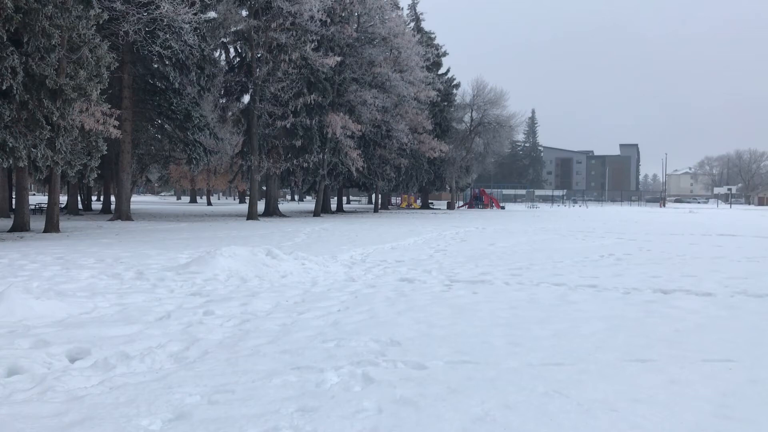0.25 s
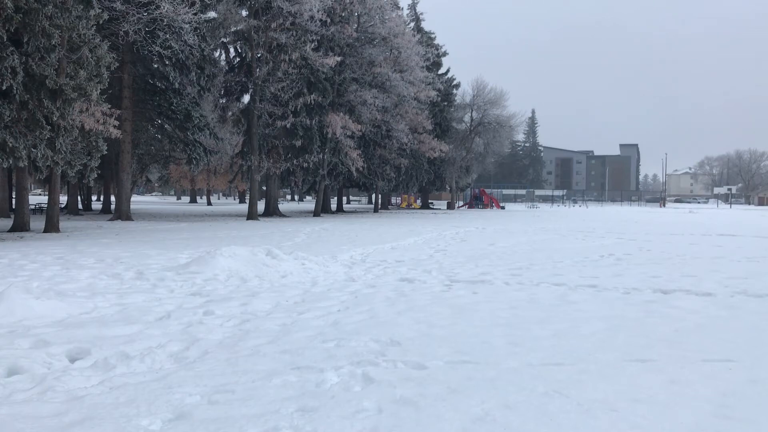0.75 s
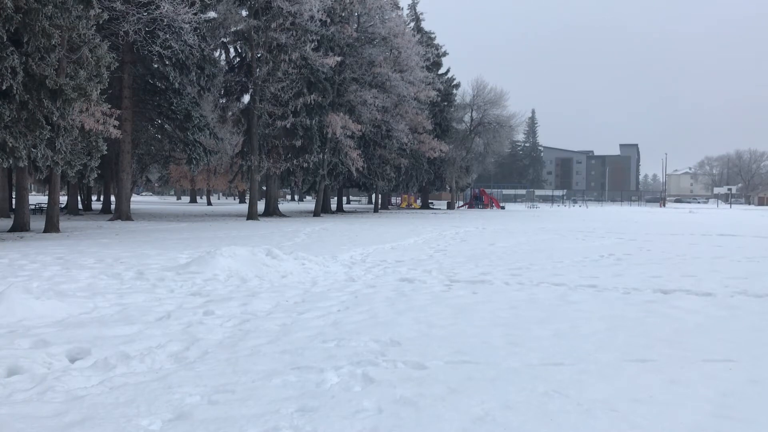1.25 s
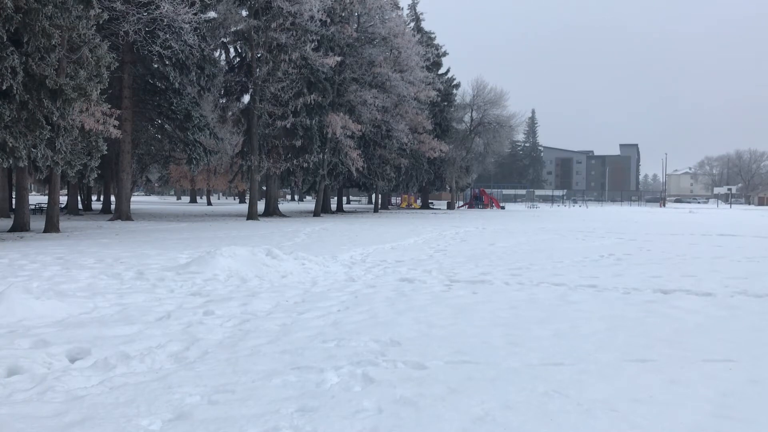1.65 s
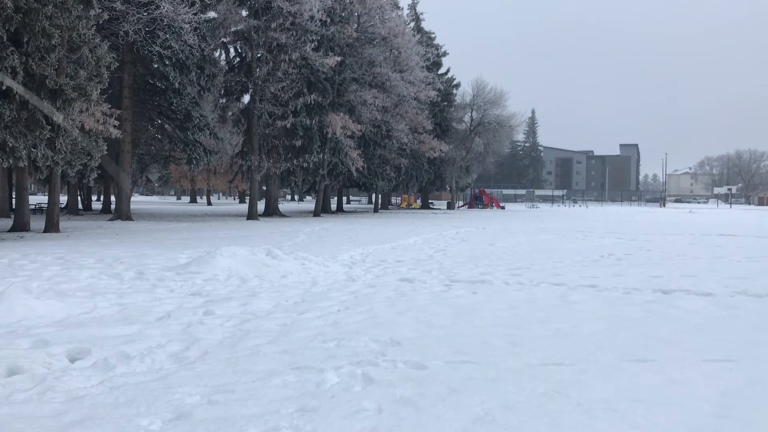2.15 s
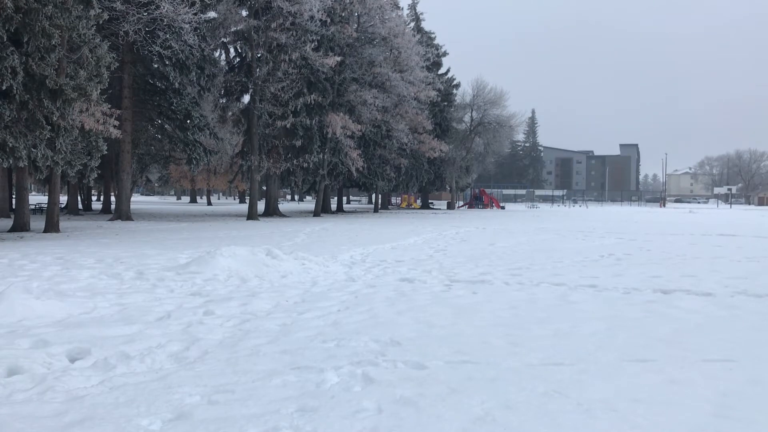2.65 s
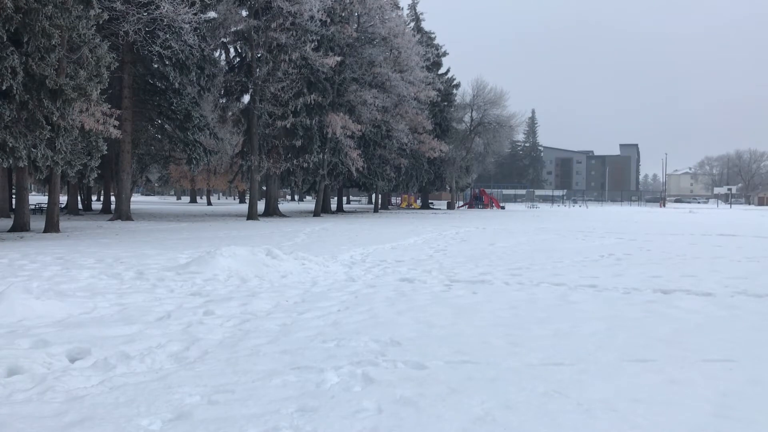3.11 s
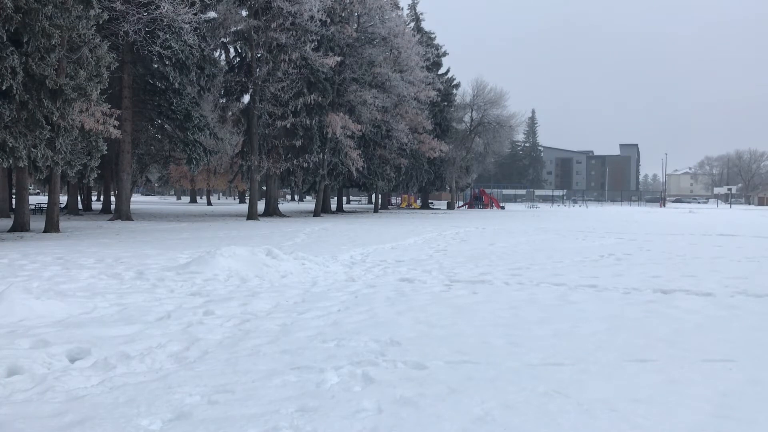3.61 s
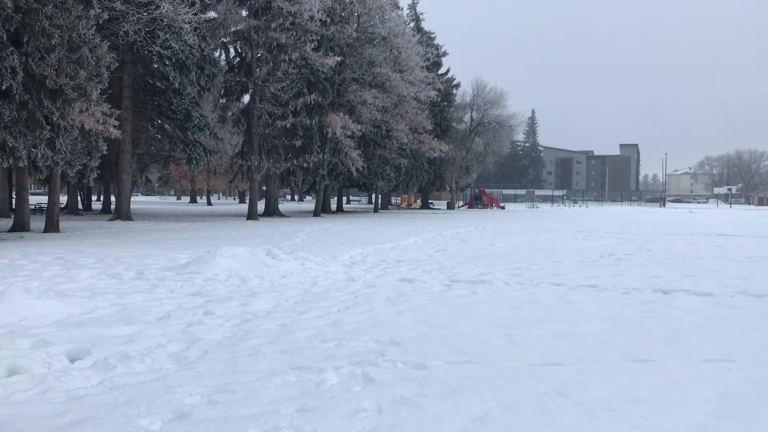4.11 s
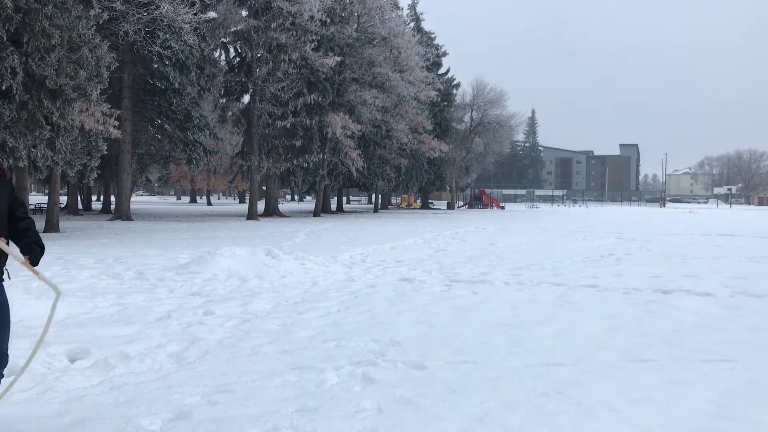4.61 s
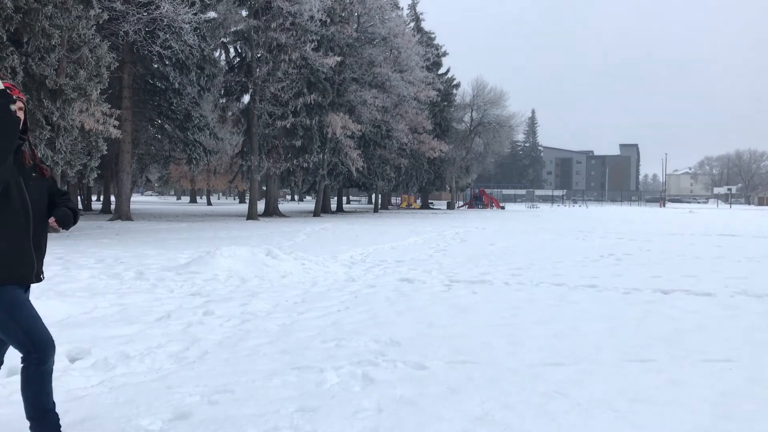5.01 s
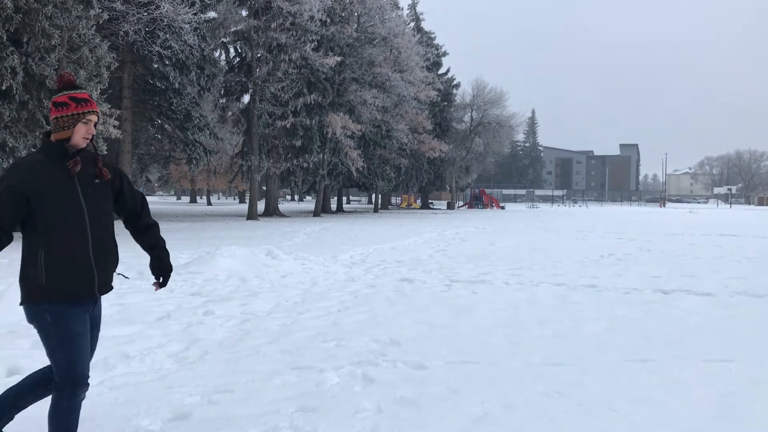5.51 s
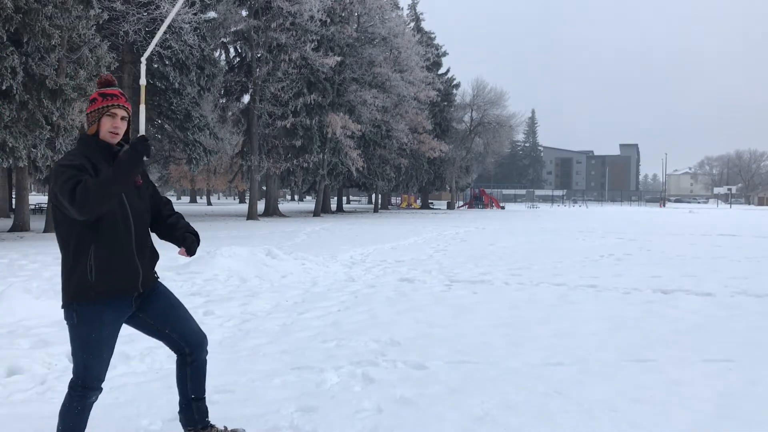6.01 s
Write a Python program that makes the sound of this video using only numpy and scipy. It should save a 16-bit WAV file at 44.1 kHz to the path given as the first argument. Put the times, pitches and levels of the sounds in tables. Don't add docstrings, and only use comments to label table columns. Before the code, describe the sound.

Outdoors in quiet winter air, a whip whistles up to piercing supersonic snaps, two thumping the microphone, each answered by scattered echoes from trees.

```python
import sys
import numpy as np
from scipy import signal
from scipy.fft import rfft, irfft, next_fast_len
from scipy.io import wavfile
from scipy.ndimage import uniform_filter1d

SR = 44100
rng = np.random.default_rng(int(sys.argv[2]) if len(sys.argv) > 2 else 0)


def store_wav(level_fs):
    pcm = np.round(np.clip(np.atleast_2d(level_fs), -1, 1) * 32767)
    wavfile.write(sys.argv[1], SR, pcm.T.astype(np.int16))


def elevation(decibels):
    levels = np.asarray(decibels, float)
    return 10 ** (levels / 20)


N = 275869


def evened(x):
    return x / np.sqrt(np.mean(x ** 2) + 1e-20)


def add(mix, s, sound):
    part = mix[round(s * SR):][:len(sound)]
    part += sound[:len(part)]


def coloured(x, points):
    f, db = np.transpose(points)
    size = next_fast_len(len(x))
    hz = np.fft.rfftfreq(size, 1 / SR)
    gain = elevation(np.interp(np.log(hz + 1), np.log(f), db))
    return irfft(rfft(x, size) * gain, size)[:len(x)]


def filtered(x, order, hz, kind):
    return signal.lfilter(*signal.butter(order, hz, kind, fs=SR), x)


def swell(length, peak, steep):
    u = np.arange(round(1.5 * length * SR)) / (length * SR)
    peak = np.clip(peak, .03, .97)
    fall = np.exp(-steep * np.maximum(u - peak, 0) / (1 - peak))
    fall *= np.minimum(4 * (1.5 - u), 1)
    return np.minimum(u / peak, 1) ** 1.5 * fall


def grains(per_s, spread_db, tail_s):
    sizes = elevation(spread_db * np.minimum(rng.exponential(1, N), 4))
    flashes = sizes * (rng.random(N) < per_s / SR)
    return rng.standard_normal(N) * signal.lfilter([1], [1, -np.exp(-1 / (tail_s * SR))], flashes)


# time in seconds, scattered echo in dB, trunk echo in dB,
# gain control dip in dB, recovery in seconds.
CRACKS = [
    (1.327, -50, -27.5, 11.5, 1),
    (2.782, -43, -25, 8, 0.065),
    (4.149, -43.5, -25.5, -1, 0.078),
    (5.418, -41.5, -29, 6, 0.083),
    (5.686, -59.5, -30, 8.5, 0.17),
]


def ducking():
    t = np.arange(N) / SR
    dip_db = sum(depth_db * np.exp(-abs(t - s) / recovery) * (t > s)
                 for s, _, _, depth_db, recovery in CRACKS)
    return elevation(-dip_db)


# time in seconds, rumble level in dB.
GUSTS = [(0, -63.5), (.5, -68), (.8, -66), (1.3, -65), (1.7, -66), (2.0, -57.5), (2.3, -53), (2.55, -60.5),
         (3.0, -65.5), (3.3, -62), (3.75, -65), (4.0, -63.5), (4.35, -57.5), (4.7, -62.5), (5.3, -65.5),
         (5.55, -50), (5.8, -68), (6.26, -64.5)]
# frequency in Hz, level in dB.
RUMBLE = [(15, -33.5), (30, -8.5), (45, 6), (70, 1.5), (110, -13), (250, -38)]


def wind():
    level = elevation(np.interp(np.arange(N) / SR, *np.transpose(GUSTS)))
    flutter = elevation(2.5 * evened(uniform_filter1d(rng.standard_normal(N), 3000)))
    rumble = evened(coloured(flutter * rng.standard_normal(N), RUMBLE))
    return elevation(2.5) * level * rumble * ducking()


# time of the peak in seconds, level in dB.
DRAGS = [
    (1.3, -63.5),
    (2.2, -62),
    (2.77, -55),
    (4.15, -55.5),
    (4.4, -67),
    (5.42, -50.5),
    (5.62, -73),
    (5.98, -59),
]
# frequency in Hz, level in dB per Hz.
WASH = [(59, -22), (100, -7), (285, -.5), (400, -3), (960, -2.5), (1500, -8), (2500, -16), (3500, -22),
        (5000, -30), (8000, -36), (16500, -38)]


def town_and_dragged_air():
    t = np.arange(N) / SR
    town_db, slope_db_per_s = -65.5, 154
    level = elevation(town_db) + sum(elevation(db - slope_db_per_s * abs(t - s)) for s, db in DRAGS)
    return elevation(7.5) * level * evened(coloured(rng.standard_normal(N), WASH)) * ducking()


# time in seconds, level
# in dB.
RUSTLE_LEVEL = [(0, -82.5), (.5, -81.5), (1.17, -90.5), (1.4, -72.5), (1.65, -73.5), (2.3, -78.5), (2.63, -81.5),
                (2.798, -60), (3.07, -74.5), (3.45, -75.5), (3.95, -100), (4.2, -60.5), (4.55, -61.5),
                (4.75, -78.5), (5.3, -75), (5.45, -58), (5.68, -64.5), (6.26, -76.5)]
# frequency in Hz, level in dB.
RUSTLE = [(1000, -33), (3000, -13), (5000, 7), (7000, 3), (9000, 9.5), (15000, 6), (17000, -8)]


def cloth():
    level = elevation(np.interp(np.arange(N) / SR, *np.transpose(RUSTLE_LEVEL)))
    rustle = .25 * evened(grains(170, 3, .00083)) + 2.3 * rng.standard_normal(N)
    rustle *= elevation(3.5 * evened(uniform_filter1d(rng.standard_normal(N), 900)))
    return elevation(10) * level * evened(coloured(rustle, RUSTLE))


# time in seconds, peak in dB.
TICKS = [(0.0207, -21.5), (0.0308, -21), (0.0376, -18), (0.2656, -33.5), (0.51, -34), (0.5716, -27.5),
         (0.623, -40), (1.5384, -30), (1.7744, -36), (1.7913, -30), (1.8452, -34), (1.885, -28.5),
         (2.0564, -34), (2.1774, -36), (2.5651, -38.5), (2.8467, -17), (2.8574, -22.5), (3.153, -32.5),
         (3.1838, -34), (3.3548, -31), (3.3788, -37), (3.4753, -17), (3.708, -32), (4.736, -28.5),
         (4.7601, -31.5), (5.155, -17.5), (5.1623, -22), (5.785, -23), (5.889, -32), (6.122, -29.5)]


def cloth_ticks():
    out, t = np.zeros(N), np.arange(600) / SR
    for s, db in TICKS:
        burst = evened(filtered(rng.standard_normal(len(t)), 1, 3000, "high"))
        add(out, s, elevation(db - 1) * burst * t / .0016 * np.exp(-t / .00083))
    return out


# delay in seconds, level in dB.
GROVE = [(.04, -9.5), (.1, -2), (.17, -4), (.26, -2.5), (.45, -10), (.65, -12.5), (.78, -10), (0.961, -9),
         (1.4, -31.5)]
# delay in seconds, half width in seconds, depth in dB.
CLEARINGS = [(0.066, .015, 6), (0.194, .014, 6), (.345, 0.0095, 2), (.42, 0.027, 2.5), (.53, .015, 3),
             (.68, 0.056, 2.5), (.88, 0.056, 1.5)]
# frequency in Hz, level in dB.
NEAR = [(500, -21.5), (1000, -27), (2500, -2.5), (4000, 4.5), (5500, -5), (7500, -8), (10000, -21),
        (15000, -39)]
FAR = [(300, -30), (700, -10), (1300, 0), (2300, 0), (3200, -5), (4500, -15), (9000, -40)]


def grove():
    t, (delay, db) = np.arange(N) / SR, np.transpose(GROVE)
    near, far = np.zeros((2, N))
    for s, echo_db, *_ in CRACKS:
        gap_db = sum(depth_db * np.exp(-((t - s - at) / width) ** 2) for at, width, depth_db in CLEARINGS)
        level = elevation(echo_db - gap_db + np.interp(t - s, delay, db, -99, -99))
        near += level * elevation(1.5 - 28 * abs(t - s))
        far += level
    patter = evened(grains(1800, 2.8, .0004)) + .7 * rng.standard_normal(N)
    return ducking() * (near * evened(coloured(patter, NEAR)) + far * evened(coloured(patter, FAR)))


# delay in seconds, level in dB, pitch in Hz.
TRUNKS = [(.08, -4, 1700), (.096, -11, 1500), (.101, 3.5, 2000), (.138, -1, 1150), (.162, 0, 1490),
          (.174, -15, 1997), (.214, -5, 1120), (0.242, -3, 1550), (.253, -4.5, 1250), (.29, -4, 1600),
          (.368, -10.5, 1300), (.38, -11, 1410), (.477, -9, 1390), (.503, -10, 1925), (.549, -6.5, 1300),
          (.566, -10, 2252), (.746, -1, 1678), (0.755, -7, 2224), (0.793, -10, 1550), (.934, -8.5, 1720),
          (.952, -10.5, 1440)]
WALL_LAG_S = [0, 0, .021, 0, 0]
# time in seconds, peak in dB, pitch
# in Hz.
STRAYS = [(2.0825, -33, 2900), (2.136, -38, 1500), (3.201, -39, 1510), (4.0331, -40.2, 1054),
          (4.0831, -31.2, 1070), (4.0901, -35, 1801), (4.675, -38, 1700), (4.744, -39, 1250),
          (4.9351, -31, 1490), (3.5911, -31, 1500), (5.0601, -32.2, 1180), (5.0791, -40.2, 1821),
          (5.5191, -29, 1101), (5.8531, -28.5, 905), (6.2521, -38, 2760)]


def trunk_taps():
    out, t = np.zeros(N), np.arange(600) / SR
    taps = list(STRAYS)
    for (s, _, echo_db, *_), lag in zip(CRACKS, WALL_LAG_S):
        for delay, db, hz in TRUNKS:
            late = lag * (delay > .7)
            taps.append((s + delay + late, echo_db + db, hz))
    for s, db, hz in taps:
        grit = evened(filtered(rng.standard_normal(len(t)), 2, [.5 * hz, 1.8 * hz], "band"))
        ring = .9 * np.sin(2 * np.pi * hz * t) + grit
        add(out, s, elevation(db - 1.5) * ring * t / .0011 * np.exp(-t / .0012))
    return out * ducking()


# delay in seconds, level in dB.
GLINTS = [(.103, -2), (.1295, -6), (.138, -7), (.165, -4), (.1735, -4), (.228, -8), (.239, -7), (.2432, -1),
          (.27, -9), (.2884, -8), (.301, -5), (.3362, -9), (.3671, -11), (.38, -2), (.4037, -14),
          (.4179, -12), (.495, -13), (.5037, -9), (.551, -13), (.569, -14), (.592, -17)]
# time in seconds, glint level in dB.
MIRRORED = [
    (1.3267, -39),
    (2.7824, -24.5),
    (4.1504, -26),
    (5.4181, -31),
    (5.6857, -35),
]


def shock_glints():
    out, t = np.zeros(N), np.arange(600) / SR
    glint = filtered(np.exp(-((t - .0002) / .00004) ** 2), 1, [1000, 4200], "band")
    for s, shock_db in MIRRORED:
        for delay, db in GLINTS:
            add(out, s + delay - .0002, -elevation(shock_db + db) * glint / glint.max())
    return out * ducking()


def strand(length, hz0, hz1, db, peak):
    shape = swell(length, peak, 1.53)
    hz = hz0 * (hz1 / hz0) ** (np.arange(len(shape)) / (length * SR))
    seed = rng.standard_normal((9000, 2)) @ [1, 1j]
    smooth = np.exp(-np.pi * .24 * hz.mean() / SR)
    two_poles = np.convolve([1, -smooth], [1, -smooth])
    wander = signal.lfilter([1, -smooth ** 4], two_poles, seed)[-len(shape):]
    wander = .75 + wander / np.sqrt(np.mean(abs(wander) ** 2))
    tone = np.exp(2j * np.pi * np.cumsum(hz) / SR)
    return elevation(db) * shape * (wander * tone).real


# start in seconds, length in seconds, first Hz, last Hz, level in dB.
BUILDING = [(0.727, 0.07, 503, 1260, -54), (0.754, 0.024, 1000, 1020, -37), (0.765, 0.015, 1275, 1650, -37),
            (.722, .014, 280, 330, -51), (1.228, .11, 455.5, 2084, -45), (1.244, 0.11, 299.3, 1000, -43.5),
            (1.3, 0.015, 1490, 3500, -33.5), (1.3155, 0.0065, 4310, 4160, -17.5),
            (2.215, .055, 771, 932, -43), (2.745, .026, 900, 1500, -41), (4.848, .024, 600, 1200, -42),
            (2.738, .022, 230, 420, -35), (1.302, .012, 1000, 2500, -29), (2.683, .095, 510, 1510, -60),
            (3.622, .02, 2400, 3100, -36), (4.12, 0.022, 1100, 1610, -28.5),
            (4.131, .022, 2180, 2800, -17.5), (4.065, .075, 320, 480, -45), (5.372, .045, 249, 800, -39.5),
            (5.304, .1, 290, 469, -43), (5.35, 0.055, 936, 1500, -35), (5.671, 0.01, 1974, 2700, -23),
            (5.967, 0.031, 1404, 2930, -38.5)]
FADING = [(.779, .012, 1900, 1500, -30), (.79, .04, 1450, 1150, -35), (.784, .016, 900, 880, -43),
          (.808, .022, 2600, 2400, -52), (2.254, .014, 1600, 1650, -33), (2.267, .03, 1800, 1350, -28),
          (2.257, .07, 1100, 900, -34.5), (2.255, .012, 2550, 2600, -38), (2.27, .022, 2750, 2450, -35),
          (2.29, .018, 2300, 2000, -40), (2.303, .035, 1350, 1120, -35), (2.35, .018, 950, 850, -45),
          (3.643, .02, 2200, 1650, -25), (3.66, .026, 1700, 1500, -29.5), (3.636, .034, 3200, 2500, -30),
          (3.638, .06, 1200, 900, -36), (4.8685, .011, 4100, 3600, -28), (4.8695, .016, 1250, 1300, -30),
          (4.88, .005, 2600, 2000, -33), (4.884, .014, 3000, 2700, -38), (4.884, .04, 1550, 1450, -34),
          (5.988, .045, 1670, 1300, -37.5), (6.017, .058, 905, 700, -44)]
WHISTLES = [(1.312, .003, 900, 500, -23), (1.316, .004, 1300, 1050, -12.5), (2.7685, .003, 900, 450, -21),
            (2.7745, .0065, 2800, 2200, -15), (2.771, .008, 6200, 5000, -24),
            (2.786, .007, 4400, 3700, -21), (2.797, .005, 2900, 2000, -31), (2.806, .02, 1500, 980, -36),
            (4.137, .009, 7200, 6000, -18), (4.138, .008, 5500, 5200, -24),
            (4.1435, .005, 3100, 2800, -12.5), (4.152, .006, 5000, 4400, -18),
            (4.153, .004, 1600, 1200, -18), (4.1565, .009, 4000, 3300, -16.5),
            (4.156, .006, 5500, 5200, -24), (4.167, .012, 2300, 1550, -24), (5.398, .012, 650, 850, -31),
            (5.4005, .005, 3400, 4400, -21), (5.405, .008, 4300, 3500, -23), (5.401, .007, 2100, 1900, -24),
            (5.407, .007, 1650, 1700, -19.5), (5.4135, .005, 2300, 1950, -16),
            (5.419, .004, 2000, 700, -17), (5.422, .006, 4700, 3400, -15), (5.427, .005, 3200, 3800, -16),
            (5.434, .004, 2700, 2300, -25), (5.439, .007, 1900, 1750, -24), (5.448, .016, 1300, 1000, -32),
            (5.6861, .007, 400, 300, -21), (5.692, .012, 3000, 4300, -28)]


def lash_tones():
    out = np.zeros(N)
    for rows, peak in ((BUILDING, .77), (FADING, .15), (WHISTLES, .3)):
        for s, *row in rows:
            add(out, s, strand(*row, peak))
    return out


def hiss(length, db, low_hz, peak):
    shape = swell(length, peak, 1.57)
    flutter = elevation(3 * evened(uniform_filter1d(rng.standard_normal(9000), 30)))
    noise = filtered(rng.standard_normal(9000) * flutter, 2, low_hz, "high")
    noise = .35 * noise + filtered(noise, 1, min(3 * low_hz, SR / 3), "low")
    return elevation(db) * shape * evened(noise[-len(shape):])


# start in seconds, length in seconds, level in dB, lowest Hz.
SWELLS = [(0.769, .022, -35, 1990), (1.271, .07, -43, 3000), (1.311, 0.0039, -20, 795),
          (1.3195, .006, -17, 1500), (1.349, .0049, -31.5, 3000), (1.353, 0.0065, -31, 2980),
          (2.234, .07, -43, 890), (2.764, .011, -26, 900), (2.784, 0.0036, -18, 4000),
          (2.823, .006, -37.5, 3000), (3.601, .074, -41, 1460), (4.134, .014, -24, 1500),
          (4.171, .018, -24.5, 8850), (4.193, .017, -34, 4500), (5.388, .043, -31.5, 2500),
          (5.457, 0.016, -30, 4600), (5.68, 0.0024, -31, 1500), (.571, .035, -56.5, 7000),
          (4.095, 0.076, -43.5, 1500), (2.736, 0.052, -47, 1500)]
BURSTS = [(.09, .09, -60, 4070), (1.3162, .009, -13, 2790), (1.331, 0.016, -27.5, 1450),
          (1.371, .011, -53, 4000), (2.193, .01, -41, 795), (2.7797, .0028, -14, 2800),
          (2.786, .027, -29.5, 1440), (2.832, 0.025, -39.5, 6000), (3.238, 0.023, -43.5, 5100),
          (3.255, .09, -48, 2610), (4.147, 0.011, -17.5, 917), (4.154, .02, -19.5, 1780),
          (4.202, 0.003, -29, 9000), (4.866, 0.055, -42, 880), (5.4, .016, -27, 1500),
          (5.76, .024, -46, 1300), (5.089, .009, -38, 1000), (5.163, .048, -51.5, 2900),
          (5.4175, 0.0036, -9.5, 2540), (5.418, .013, -16, 5000), (5.437, .031, -29.5, 2480),
          (5.469, .0057, -21.5, 8000), (5.662, .004, -25, 900), (5.683, .025, -26.5, 2500),
          (5.6905, .006, -22.5, 3000), (5.785, .04, -40, 1420)]


def tip_hiss():
    out = np.zeros(N)
    for rows, peak in ((SWELLS, .53), (BURSTS, .1)):
        for s, *row in rows:
            add(out, s, hiss(*row, peak))
    return out


# time in seconds, peak in dB, fading time in seconds.
THUMPS = [(0.783, -32, 0.0049), (1.4455, -34, 0.02), (2.784, -19.5, 0.0065), (4.152, -21.5, 0.0055),
          (5.42, -22, 0.0042), (1.3281, -6.2, .021), (5.6872, -6.4, .0185), (3.278, -37, 0.0055),
          (3.609, -43.5, 0.0058), (4.249, -42.5, 0.013), (4.531, -37.5, 0.0042), (5.947, -51, 0.017)]


def air_thumps():
    out, t = np.zeros(N), np.arange(4000) / SR
    turns = 43 * t + .65 * (1 - np.exp(-t / .0041))
    onset = 1 - np.exp(-(t / .0008) ** 2)
    for s, db, fade in THUMPS:
        add(out, s, elevation(db) * np.sin(2 * np.pi * turns) * np.exp(-(t / fade) ** 2) * onset)
    return out


# time in seconds, peak pressure, rebound share.
SNAPS = [(1.3131, -.25, .6), (1.32673, .75, .5), (1.33022, .6, .3), (2.75916, -.09, .2), (2.78238, .72, .2),
         (4.14928, .4, .2), (4.15041, .55, .4), (4.87222, .07, .6), (1.317, -.35, .4), (2.781, -.4, .2),
         (4.1543, .2, .3), (5.41812, -.5, .2), (5.41878, .5, .3), (5.68567, .7, .25)]


def tip_snaps():
    out = np.zeros(N)
    ms = 1000 * np.arange(4000) / SR - .2
    front = .45 * np.exp(-((ms + .09) / .022) ** 2) - 1.3 * np.exp(-(ms / .032) ** 2)
    rebound = np.sin(2 * np.pi * .8 * (ms - .05)) * np.exp(-ms / .7) * (ms > .05)
    for s, pressure, share in SNAPS:
        add(out, s - .0002, pressure * (front + share * rebound))
    return out


def scene():
    background = wind() + town_and_dragged_air() + cloth() + cloth_ticks()
    echoes = grove() + trunk_taps() + shock_glints()
    whip = lash_tones() + tip_hiss() + air_thumps() + tip_snaps()
    return (background + echoes + whip)[None]


def roll_off(x):
    return signal.sosfilt(signal.butter(12, 16820, fs=SR, output="sos"), x)


# frequency in Hz, gain in dB.
CAPSULE = [(20, 0), (4000, 0), (7000, -1), (8000, -4), (9200, -1), (10500, -6), (12000, 0), (15000, 3),
           (16500, 0)]


def record(dry):
    heard = coloured(dry[0], CAPSULE)
    heard = heard / (1 + (heard / .76) ** 6) ** (1 / 6)
    edged = coloured(heard, [(20, 0), (15900, 0), (16100, -32), (16800, -40)])
    return roll_off(edged[None])


dry = scene()
out = record(dry)
store_wav(out)
```